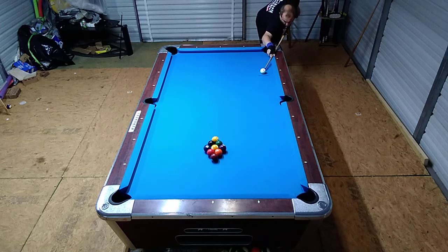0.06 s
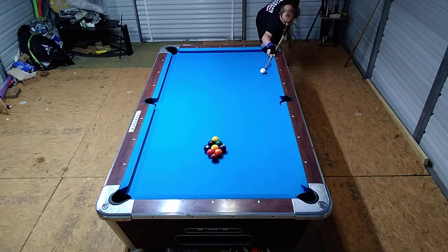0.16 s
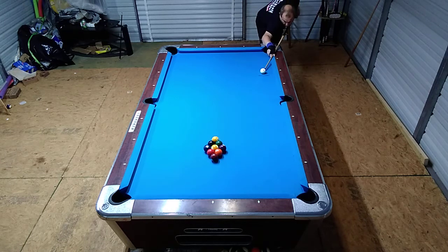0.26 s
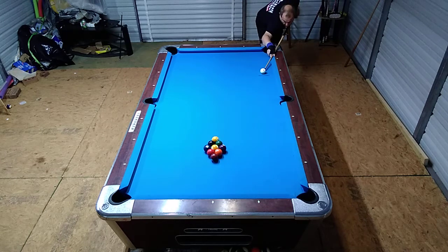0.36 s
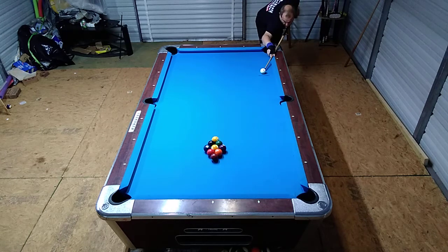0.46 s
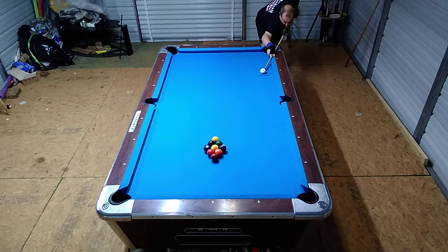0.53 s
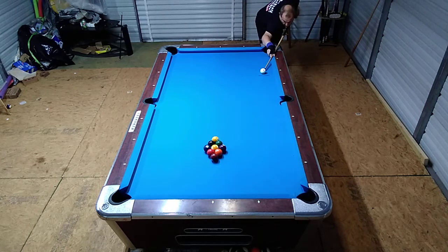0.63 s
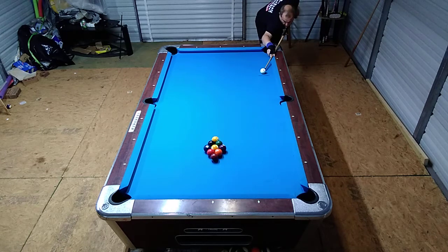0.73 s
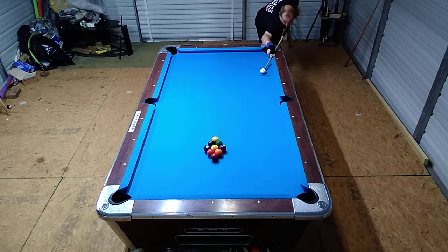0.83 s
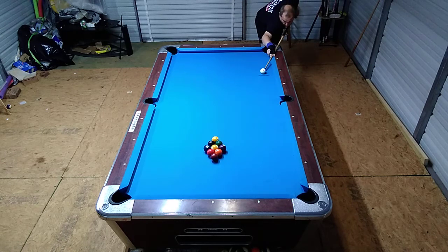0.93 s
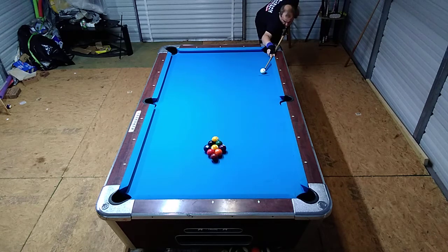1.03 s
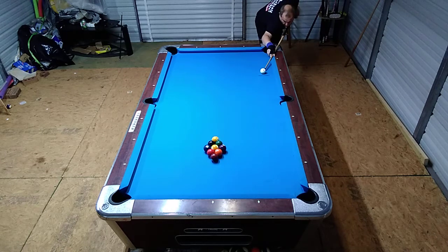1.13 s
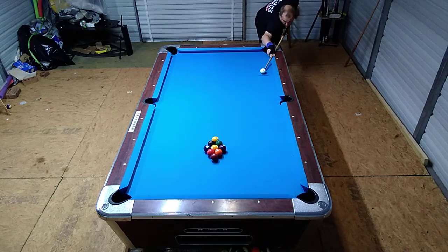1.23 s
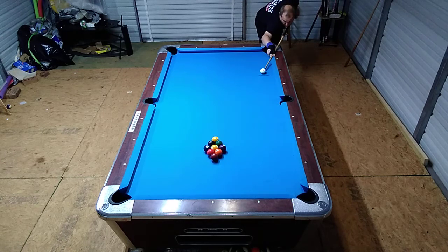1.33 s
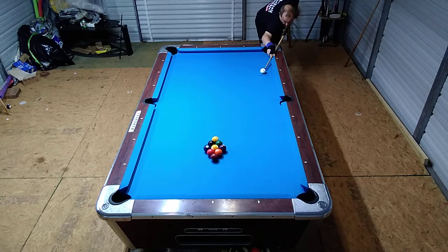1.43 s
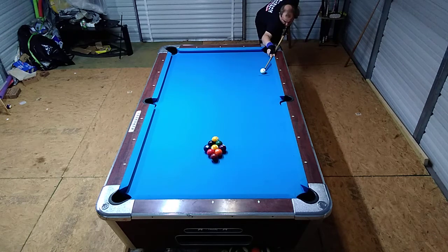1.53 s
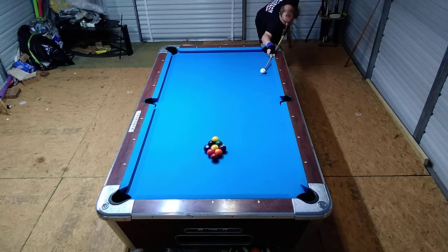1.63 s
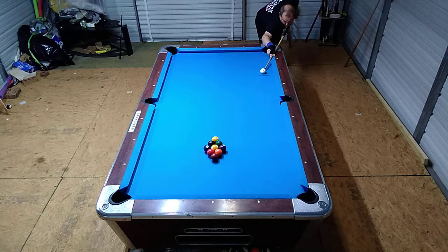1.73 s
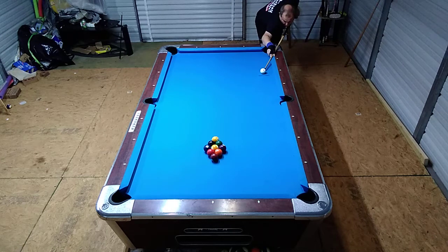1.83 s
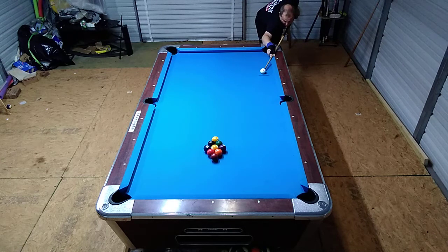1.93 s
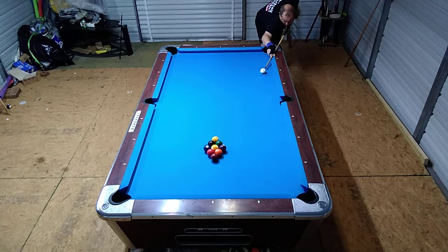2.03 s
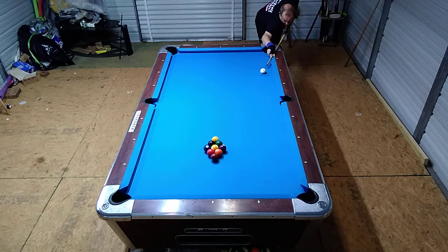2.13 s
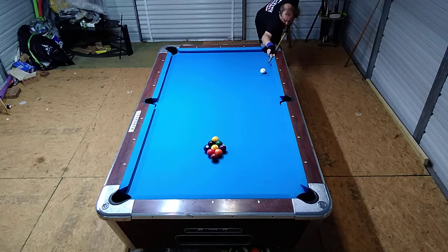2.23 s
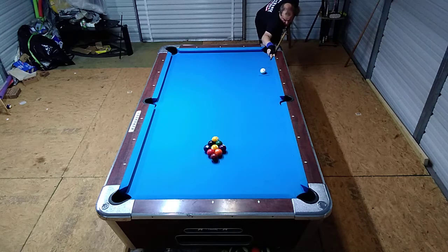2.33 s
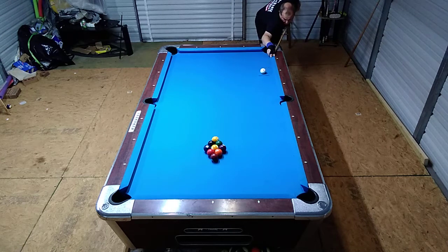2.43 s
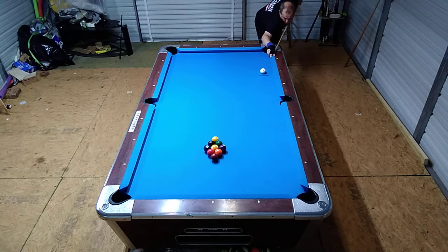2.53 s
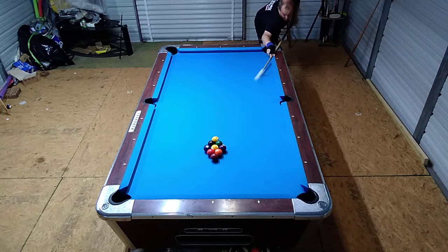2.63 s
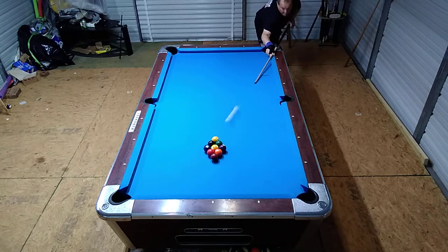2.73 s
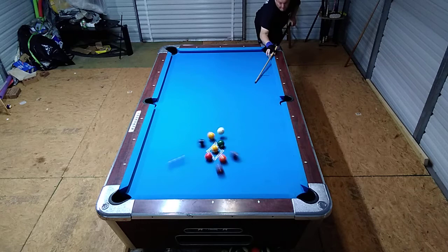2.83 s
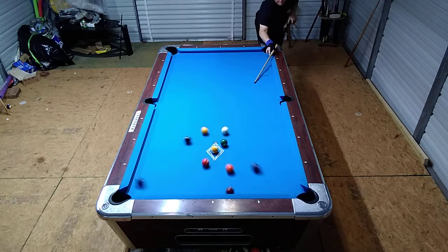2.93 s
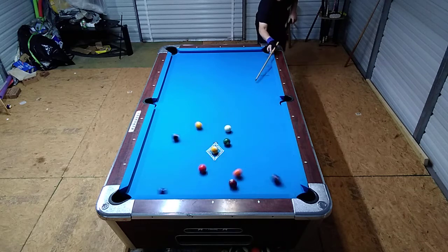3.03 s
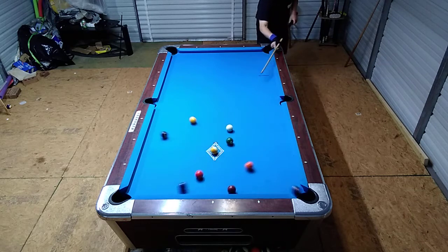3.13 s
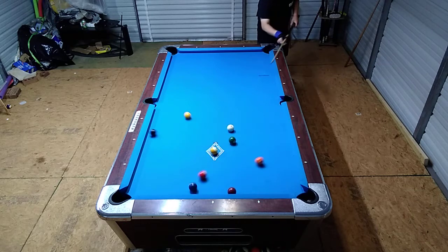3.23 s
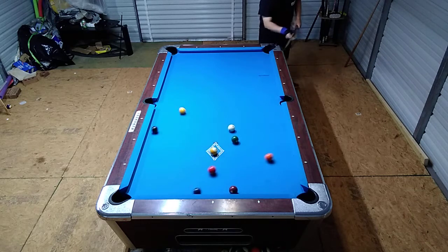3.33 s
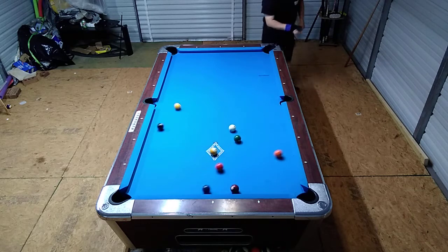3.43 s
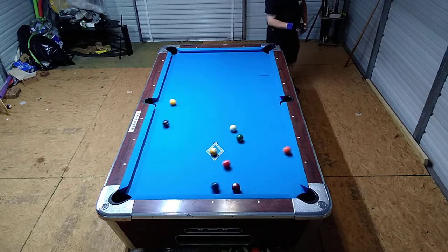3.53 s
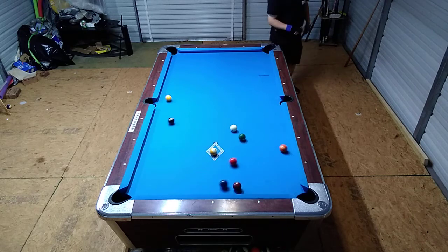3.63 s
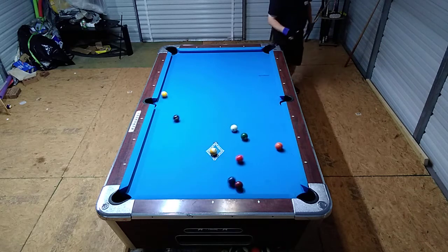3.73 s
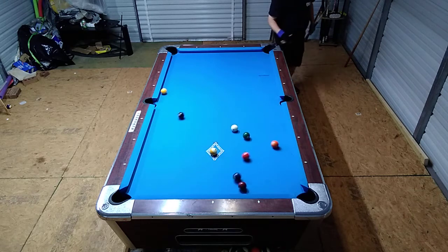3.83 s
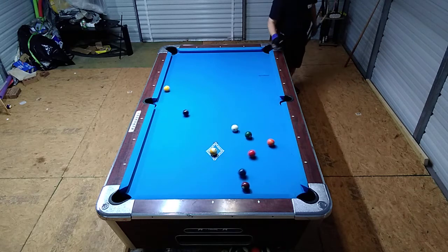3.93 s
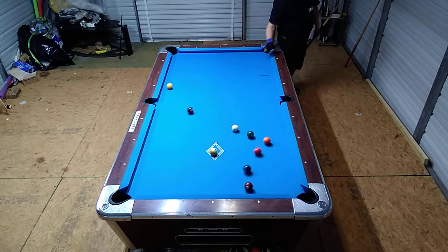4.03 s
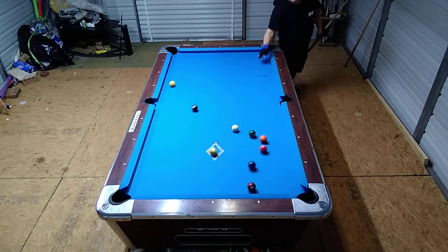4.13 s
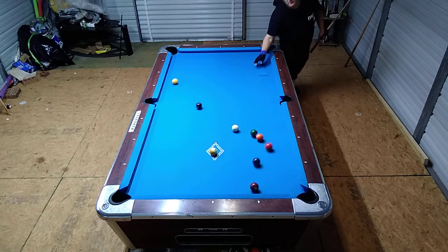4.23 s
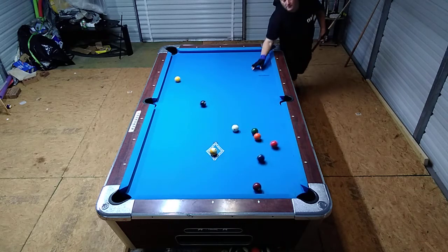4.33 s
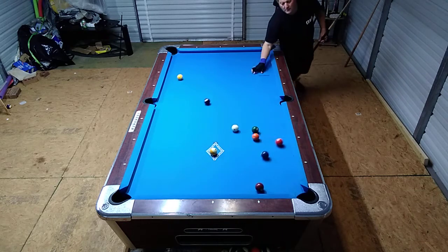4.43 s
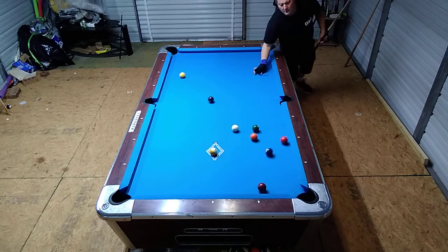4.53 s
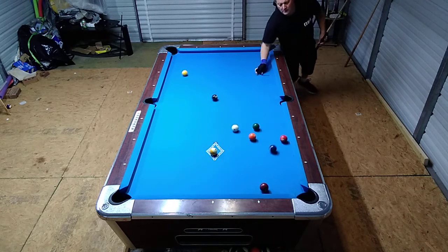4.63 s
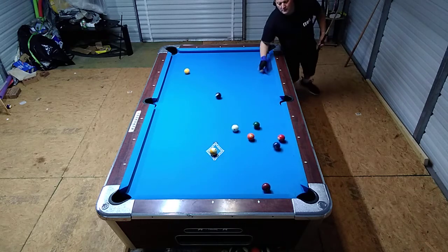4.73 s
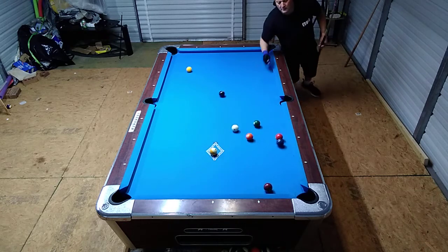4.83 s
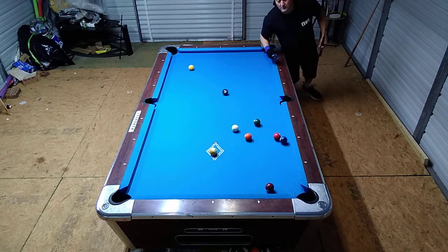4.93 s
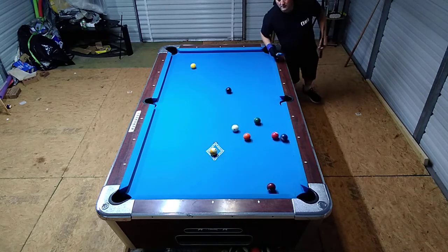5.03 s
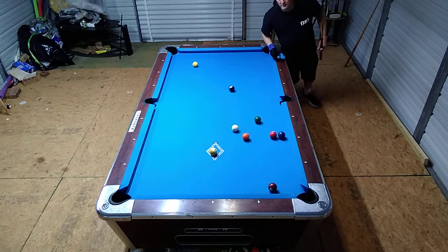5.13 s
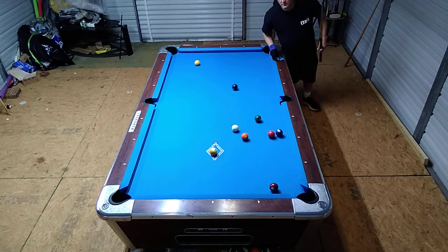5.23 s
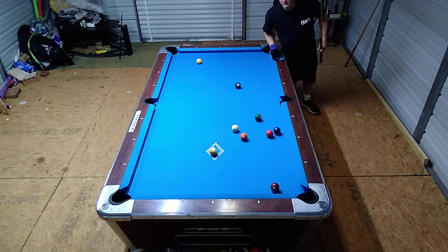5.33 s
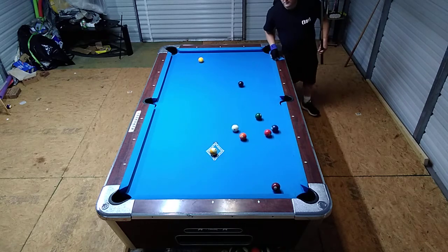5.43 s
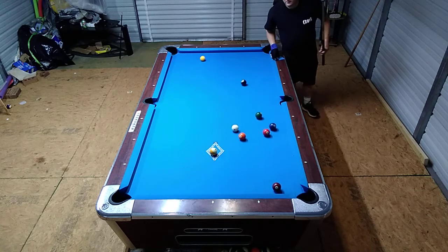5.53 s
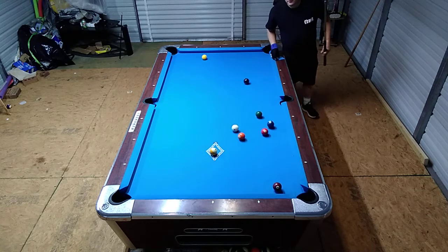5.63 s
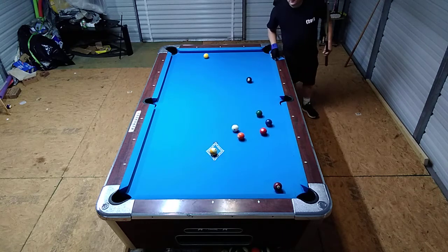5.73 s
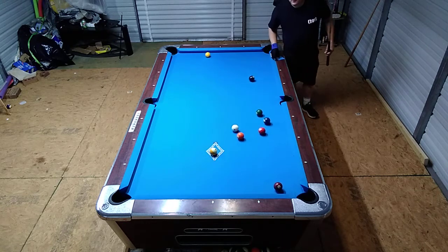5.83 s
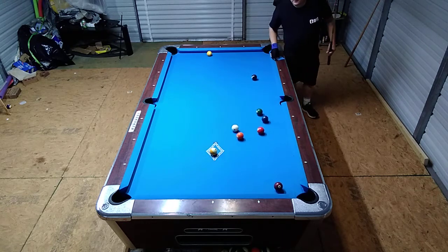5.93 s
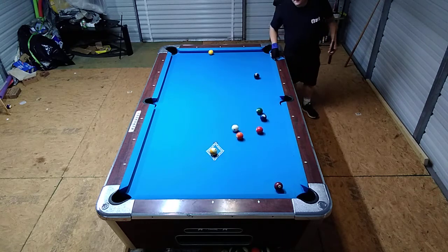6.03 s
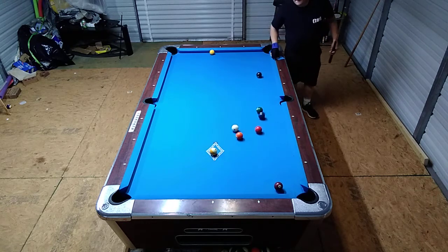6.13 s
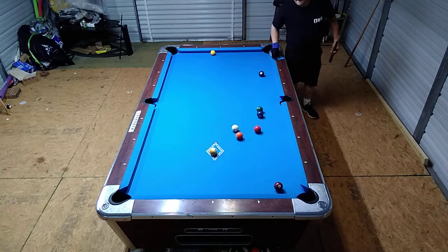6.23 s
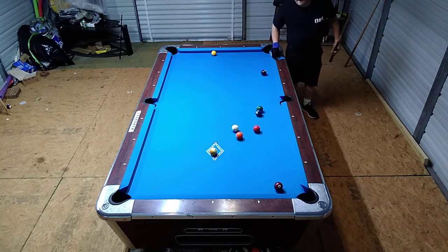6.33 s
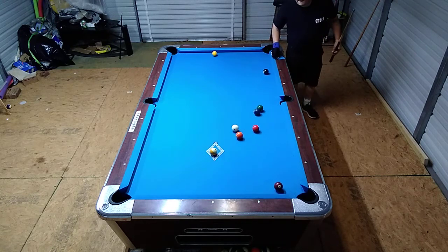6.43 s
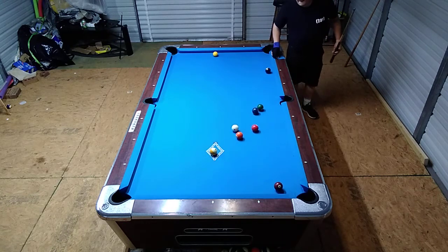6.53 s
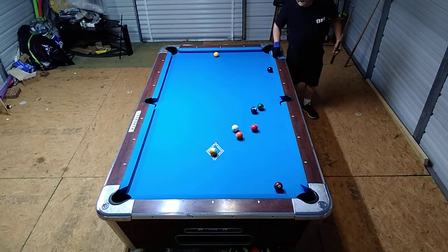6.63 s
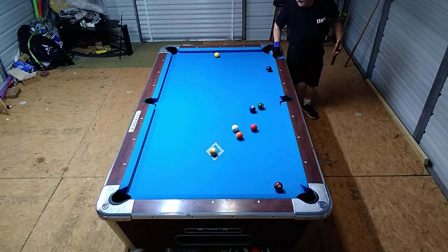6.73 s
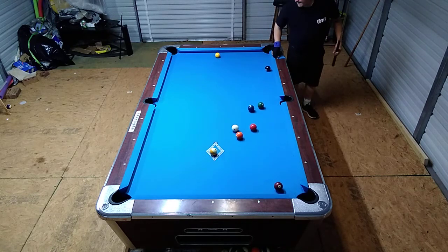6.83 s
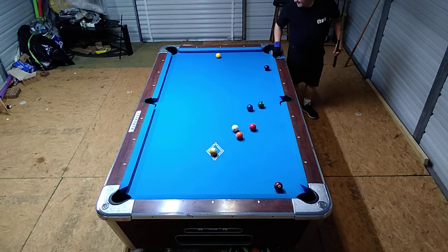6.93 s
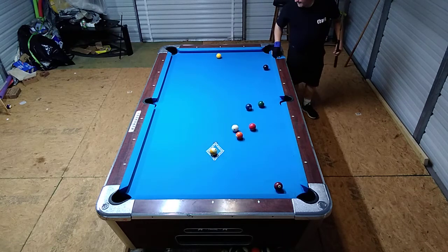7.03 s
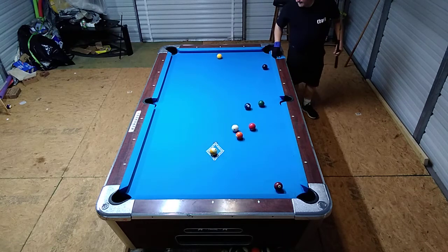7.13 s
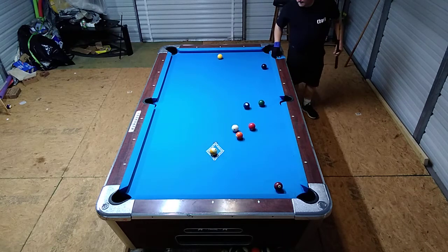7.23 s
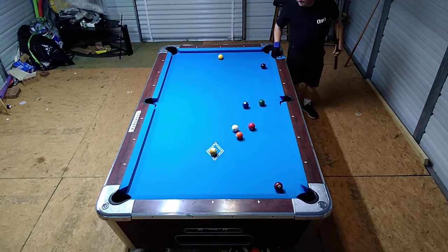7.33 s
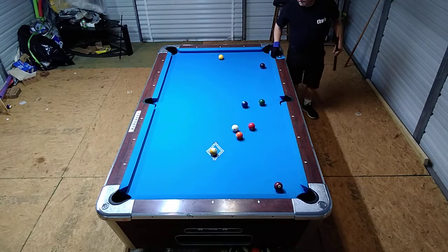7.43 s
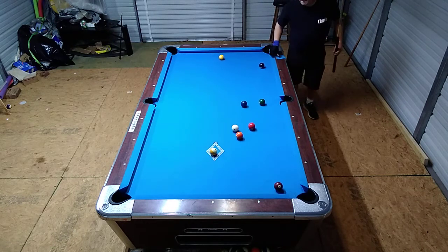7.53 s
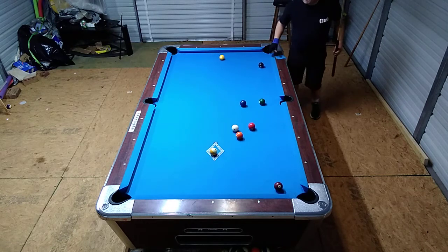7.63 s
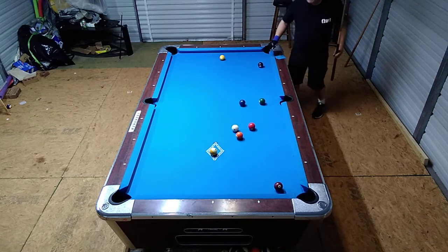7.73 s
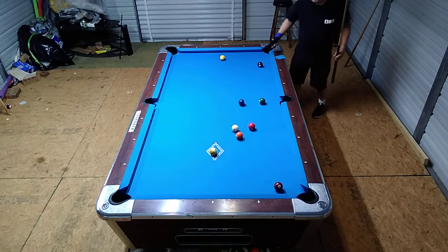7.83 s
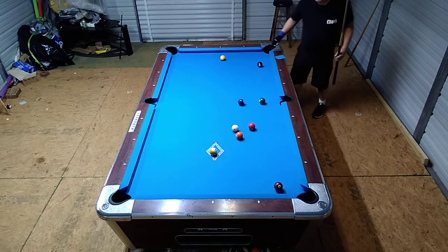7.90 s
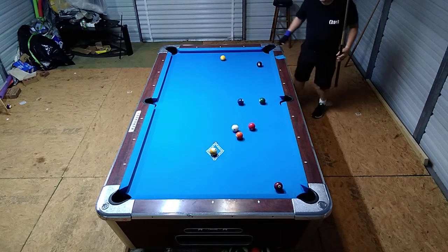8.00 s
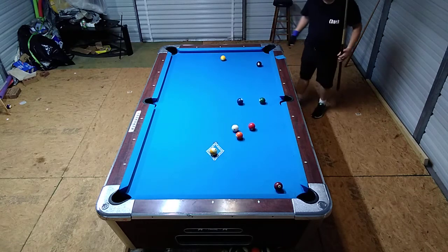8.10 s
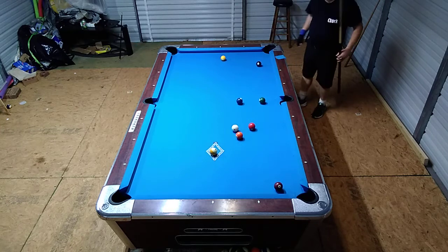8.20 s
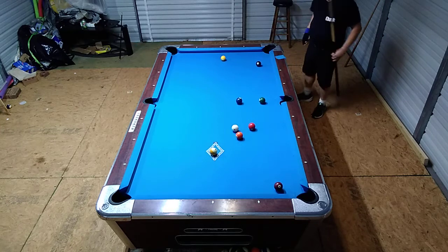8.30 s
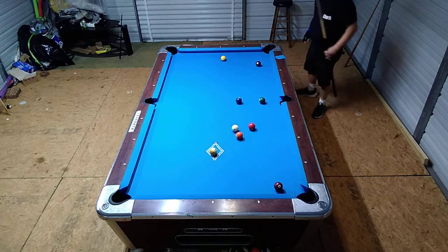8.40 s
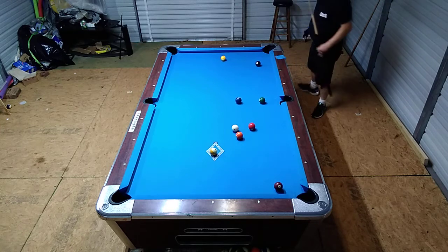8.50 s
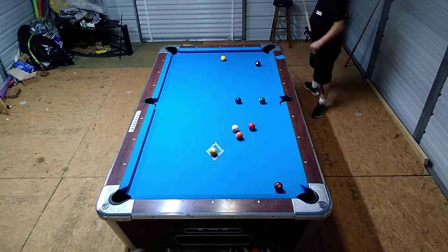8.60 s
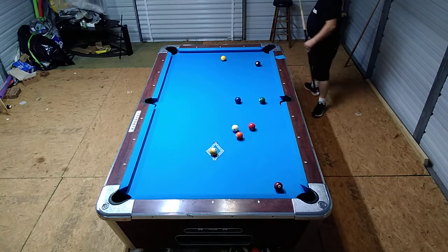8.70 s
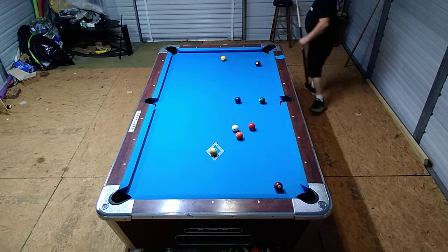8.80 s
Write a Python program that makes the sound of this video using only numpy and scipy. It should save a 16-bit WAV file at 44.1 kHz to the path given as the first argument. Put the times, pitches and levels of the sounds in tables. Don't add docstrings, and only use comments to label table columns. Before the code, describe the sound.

A quiet garage with a faint fridge hum and outdoor bird, until a pool cue strikes and the rack bursts very loudly. Hard resin clicks, hollow pocket thuds and cabinet booms tumble out within a second. Afterwards come a short squeak, board-floor steps, two long hollow ball rolls inside the table, a loud bird trill between, and a cluster of tray clacks fading away. Microphone near the table's foot, with lively metallic room echo.

```python
import sys
import numpy as np
from scipy import signal
from scipy.fft import rfft, irfft, next_fast_len
from scipy.io import wavfile
from scipy.ndimage import uniform_filter1d

SR = 44100
rng = np.random.default_rng(int(sys.argv[2]) if len(sys.argv) > 2 else 0)


def to_linear_factor(level_db):
    exponent = np.asarray(level_db, float) / 20
    return 10 ** exponent


def put_to_file(sound):
    columns = np.atleast_2d(sound).T
    safe = np.clip(columns, -1, 1)
    whole_steps = np.round(safe * 32767)
    wavfile.write(sys.argv[1], SR, whole_steps.astype(np.int16))


N = 390726
T = np.arange(N) / SR

# (multiple of motor turn [1], level [dB])
MOTOR_LINES = [(1, -74), (2, -66.5), (3, -79), (4, -85), (5, -89.5), (6, -93.5), (7, -88.5), (8, -85),
               (9, -85), (10, -88), (11, -89), (12, -95.5)]
# (frequency [Hz], density [dB/Hz])
AIR_SPECTRUM = [(25, -14.5), (55, -5), (90, -10.5), (150, -17.5), (200, -18.5), (326, -23), (560, -26),
                (750, -31), (900, -32.5), (3000, -36.5), (5000, -38), (8590, -47.5), (14800, -39),
                (16000, -45.5)]
# (frequency [Hz], side minus mid [dB])
PORT_WIDTH = [(60, -24), (110, -15.5), (200, -10), (380, -10), (700, 1), (1290, -0.5), (2380, 0),
              (4400, 1.5), (8120, -1), (15000, 2)]
# (frequency [Hz], t60 [s])
ROOM_T60 = [(60, 0.46), (250, 0.95), (1000, 0.45), (3000, 0.5), (8000, 0.53), (15000, 0.29)]
# (start [s], notes [count], peak [dB], pitch [Hz], fall [share])
BIRD_PHRASES = [
    (0.0044, 2, -75.5, 3170, .04),
    (0.62, 2, -73, 3130, .04),
    (0.7994, 1, -75, 2950, .04),
    (0.944, 3, -70, 3140, 0.036),
    (1.3, 8, -83, 3150, .1),
    (4.6499, 5.9, -60.5, 3200, 0.18),
    (5.2242, 7.1, -58.5, 3196, 0.18),
    (6.3244, 1.9, -64, 3330, 0.27),
]
# (time [s], low level [dB], swish over low [dB])
SWING = [
    (2.6, -82, -4),
    (2.65, -73.5, -19),
    (2.68, -66, -10),
    (2.72, -67.5, -7),
    (2.747, -63, -5.5),
]
# (time [s], level [dB])
SQUEAK = [
    (3.6, -79),
    (3.66, -61),
    (3.75, -53),
    (3.82, -57),
    (3.86, -59.5),
]
# (centre [Hz], width [Hz], level [dB])
SQUEAK_BANDS = [(1270, 126, -3.5), (1900, 270, -9.5), (2700, 330, -13.5)]
# (time [s], half length [s], level [dB])
BRUSHES = [
    (8.838, 0.024, -68),
]
# (frequency [Hz], level [dB], t60 [s])
SHAFT_MODES = [(1180, -4, .025), (1492, 0, .115), (2222, -11, .3), (2269, -12, .3), (2650, -2, .015)]
# (frequency [Hz], density [dB/Hz])
TIP_SPECTRUM = [(200, -12), (600, -7.5), (1200, -9.5), (1900, -29.5), (2400, -6.5), (3300, -10),
                (4500, -11), (6000, -12.5), (8500, -12.5), (11000, -10.5), (14000, -20), (16000, -20.5)]
# (frequency [Hz], level [dB], t60 [s])
FERRULE_MODES = [(2853, -12, .15), (3681, -2, .8), (3723, 0, .8), (3838, -8, .3)]
# (time [s], peak [dB], rap [dB], thump [dB], bright edge [dB])
RAIL_KNOCKS = [
    (2.848, -12, -32, -12.5, -26),
    (3.029, -10.5, -1, -20, -18.5),
    (3.045, -10, -35, -7, -44),
    (3.3274, -12, -5.5, -1, -15.5),
    (3.391, -16.5, 0, -1, -10),
    (3.436, -23, -27, 1.5, -18),
    (3.924, -67, -10, 25, -34),
]
# (time [s], peak [dB], rap [dB], thump [dB], bright edge [dB])
BEND_KNOCKS = [(4.022, -34, -2, -7, -42), (4.047, -49, -17, 19, -38), (4.123, -29.5, -2.5, 5.5, -22.5),
               (4.142, -42, -16, 9, -30), (4.268, -35.5, -7, 12, -21), (4.939, -57, -2, 21, -30),
               (5.6025, -19.5, -16, 5.5, -40), (5.634, -16.5, -12.5, -6, -36), (5.64, -28, -9, 7.5, -25),
               (5.66, -24, -16, 5.5, -39), (5.694, -27, -8.5, 2, -19.5), (6.0234, -20, -15, -5.5, -36),
               (6.04, -27, -30, 1, -43), (6.104, -31, -15, 6, -40), (6.376, -46, -21, 0, -27),
               (6.727, -52.5, -11, 4, -30)]
# (time [s], peak [dB], rap [dB], thump [dB], bright edge [dB])
TRAY_KNOCKS = [(7.09, -39, 0.5, 7, -29), (7.111, -35, -10, 11, -47), (7.132, -33, -20, 7, -48.5),
               (7.196, -26.5, 0, 3.5, -27), (7.24, -32.5, -13, 10.5, -48), (7.343, -29.5, -8, -6, -48),
               (7.385, -34.5, -22, 5.5, -48), (7.49, -48, -8, 16, -29), (7.817, -68.5, -4, 11, -9.5),
               (7.881, -43, -14, 4.5, -45), (7.96, -52, -8, 8.5, -28), (8.133, -53, -29, 13, -40),
               (8.163, -63, -28.5, 29.5, -29), (8.725, -61.5, -22.5, 10.5, -5.5), (8.813, -57, 11, 13, 4.5)]
# (frequency [Hz], level [dB], t60 [s])
CABINET_MODES = [(57, -4.5, 0.28), (101, -2, 0.31), (110.5, -8.5, 0.25), (152, 2, 0.22), (182.3, 4, 0.22),
                 (264, 9, .2), (291.9, 2.5, 0.44), (344, 3, 0.15), (399.2, -2.5, 0.23), (447, -1, 0.11),
                 (495, -6.5, 0.24), (547.7, -9, 0.19), (604, -7, 0.097), (680, -8, 0.047),
                 (750, -12, 0.026), (800, -17.5, 0.073), (1144, -14, 0.089), (1275, -13.5, 0.045),
                 (1875, -15, 0.045)]
# (frequency [Hz], level [dB], t60 [s])
PANEL_MODES = [(88.27, -3, .2), (124, -5, .15), (207, 1.5, 0.18), (280, 7.5, .25), (326.3, 5.5, .25),
               (377.1, 0, 0.18), (636, -8, .15)]
# (time [s], peak [dB], ring [Hz])
RACK_CLICKS = [(2.8963, 5, 2600), (2.8988, 1, 2600), (2.9012, -9, 2300), (2.9122, -11, 2200),
               (2.9205, -11, 2950), (2.9242, -10, 2800), (2.9265, -11, 2600), (2.9301, -8, 2700),
               (2.9302, -14, 1300), (2.933, -9, 2800), (2.9357, -4, 2650), (2.9487, -8, 2500),
               (2.9531, -13, 2600), (2.9588, -13, 1900), (2.9657, -7.5, 2500), (2.9735, -12, 2400),
               (2.9855, -15, 2400), (2.9897, -16, 2500), (3.015, -17, 2400)]
# (time [s], peak [dB], ring [Hz], bright edge [dB], left minus right [dB])
BALL_CLICKS = [
    (3.125, -6.5, 2260, -20, 14),
    (3.1489, -23, 2300, -14, 21),
    (3.303, -11, 2202, -14.5, 2),
    (3.835, -41.5, 2153, -22, -5),
    (3.841, -31.5, 1930, -20.5, -14),
    (4.3921, -29.5, 1930, -23, 14),
]
# (time [s], peak [dB], ring [Hz])
KISSES = [
    (6.4665, -42.5, 1610),
    (6.5281, -61, 1790),
]
# (time [s], peak [dB], ring [Hz], bright edge [dB], left minus right [dB])
CLICK_TWINS = [
    (4.3899, -30, 2020, -24, -5),
]
# (lag [s], level [dB])
SLATE_REPEATS = [
    (0, -0.5),
    (.0007, -3.5),
    (.0016, -10),
    (.0029, -9.5),
    (.0045, -20.5),
]
# (time [s], peak [dB])
TRAY_CLACKS = [(7.0862, -38), (7.111, -32.5), (7.1928, -22), (7.2039, -24.5), (7.2395, -23),
               (7.2627, -30.5), (7.3441, -24.5), (7.3668, -34), (7.386, -33.5), (7.421, -40),
               (7.489, -43.5), (7.5532, -54.5)]
# (frequency [Hz], level [dB], t60 [s])
CLACK_MODES = [(1238, 1, 0.067), (1487, -1, 0.038), (1876, 3.5, 0.036), (2290, 0.5, 0.022),
               (2670, -2, 0.017), (3130, -8, 0.019), (3770, -15, 0.024)]
# (time [s], level [dB], boom over level [dB], hold [s], t60 [s])
POCKET_FALLS = [
    (3.03, -22, 0, 0.062, 0.53),
    (3.327, -22, -9.5, 0.034, 0.63),
    (3.41, -28.5, -1.5, 0.1, 0.35),
]
# (time [s], level [dB], boom over level [dB], hold [s], t60 [s])
RUN_FALLS = [
    (4.023, -33, -9, 0.053, 0.64),
    (4.124, -32, -1.5, 0.085, 0.39),
    (5.603, -22.5, -5.5, 0.07, 0.89),
    (6.024, -31, -4, 0.11, 0.71),
    (7.131, -21, -8, 0.083, 0.59),
    (7.26, -39, -3.5, 0.19, 0.59),
]
# (time [s], level [dB], boom over level [dB], hold [s], t60 [s])
ROLL_BACKS = [
    (7.881, -45.5, 1, 0.069, 0.42),
    (8.13, -55.5, 13, 0.053, 0.59),
]
# (time [s], level [dB])
CLOTH_ROLL = [
    (2.752, -25),
    (2.87, -32.5),
    (3.02, -25),
    (3.05, -28.5),
    (3.6, -44),
    (3.77, -52.5),
    (3.87, -62.5),
    (4.01, -59),
    (4.03, -71),
]
# (time [s], level [dB])
RUN_ROLLS = [
    [(4.13, -50), (4.4, -32), (4.55, -43), (4.78, -44), (4.86, -47), (5.08, -37.5), (5.3, -42.5),
     (5.46, -37.5), (5.6, -40), (5.63, -59.5)],
    [(6.05, -55), (6.3, -44.5), (6.5, -36), (6.74, -37.5), (7.0, -38.5), (7.12, -32), (7.16, -60)],
    [(8.2, -69), (8.44, -67.5), (8.56, -62.5), (8.76, -58.5), (8.86, -64.5)],
]
# (time [s], peak [dB])
FOOTFALLS = [(3.66, -37), (3.781, -50), (3.92, -43.5), (5.04, -46.5), (5.33, -44.5), (5.529, -39.5),
             (6.81, -38), (6.99, -50), (7.805, -49.5), (8.48, -64.5), (8.71, -47)]
# (frequency [Hz], level [dB])
CLATTER_SPECTRUM = [(400, -14.5), (750, 2.5), (1400, -8.5), (1900, -16), (3000, -25), (5000, -39), (15000, -50)]
# (frequency [Hz], level [dB], t60 [s])
LINER_MODES = [(1300, -1, 0.13), (1310, -8.5, 0.0974)]
# (boom [dB], drum [dB], rumble [dB], clatter [dB])
POCKET_MIX_DB, RUN_MIX_DB = (0.4, -0.3, 0.74, -26), (1.2, 0.1, 1, -10.5)
CLOTH_MIX_DB, TRACK_MIX_DB = (-8, 0, -3, -35), (-7, 1.5, -0.5, -18.5)
SETTLE_MIX_DB, STEP_MIX_DB = (-2.6, 1.1, 1, -3.5), (0.9, -30, -18.5, -41)

CUE_S, FERRULE_LAG_S = 2.7483, 0.0062
TIP_DB = -12.5


def on_log(table, hz):
    points_hz, values = np.array(table).T
    return np.interp(np.log(np.maximum(hz, 1)), np.log(points_hz), values)


def colour(x, table):
    length = x.shape[-1]
    size = next_fast_len(length)
    gain = to_linear_factor(on_log(table, np.fft.rfftfreq(size, 1 / SR)))
    return irfft(rfft(x, size) * gain, size)[..., :length]


def band(x, lo_hz, hi_hz):
    edges_hz = [lo_hz, min(hi_hz, 0.45 * SR)]
    return signal.sosfilt(signal.butter(2, edges_hz, "band", fs=SR, output="sos"), x)


def unit(x):
    return x / np.sqrt(np.mean(x ** 2))


def curve(rows, column):
    rows = np.array(rows)
    return to_linear_factor(np.interp(T, rows[:, 0], rows[:, column], left=-200, right=-200))


def walk(rate_hz):
    k = int(SR / rate_hz)
    steps = np.repeat(rng.standard_normal(N // k + 1), k)
    return 2.2 * uniform_filter1d(uniform_filter1d(steps, k), k)[:N]


def wide(size):
    mid, side = rng.standard_normal((2, size))
    side = colour(side, PORT_WIDTH)
    return np.array([mid + side, mid - side])


def ring(modes, seconds, damp=0.73, scatter_db=0.):
    t = T[:int(seconds * SR)]
    y = np.zeros(len(t))
    for hz, db, t60_s in modes:
        level = to_linear_factor(db + scatter_db * rng.normal()) * rng.choice([-1, 1])
        y += level * np.sin(2 * np.pi * hz * t) * to_linear_factor(-60 * t / (t60_s * damp))
    return y / np.abs(y).max()


def add(track, s, sound):
    i = int(s * SR)
    track[..., i:i + sound.shape[-1]] += sound[..., :track.shape[-1] - i]


def floor():
    hum = np.zeros(N)
    for turn, db in MOTOR_LINES:
        phase = 2 * np.pi * (turn * 61.47 * T + rng.random())
        hum += to_linear_factor(db - 0.5 + (0.5 + 0.13 * turn) * walk(2.5)) * np.sin(phase)
    air = colour(wide(N), AIR_SPECTRUM)
    air = air * to_linear_factor(-80) / np.std(band(air, 1100, 16000))
    sag_db_per_s = 1.96
    hiss_db = np.where(T < CUE_S, -92.5, -69.5 - sag_db_per_s * (T - CUE_S))
    return hum + air * to_linear_factor(0.43 * walk(3.2)) + to_linear_factor(hiss_db) * unit(band(wide(N), 1900, 19000))


def bird():
    out, t = np.zeros(N), T[:700]
    note_gap_s, swell_db = 0.0315, 11
    for s, notes, db, hz, fall in BIRD_PHRASES:
        for k in range(min(round(notes), 8)):
            late, off = rng.standard_normal(2)
            glide = 1 + fall / 2 * (1 - t / t[-1])
            note = np.hanning(len(t)) * np.sin(2 * np.pi * hz * (1 + 0.012 * off) * t * glide)
            soft_db = swell_db * (np.exp(-k / 2) if notes > 4 else k / 2)
            add(out, max(s - 0.004 + k * note_gap_s + 0.00058 * late, 0), to_linear_factor(db - soft_db) * note)
    return out


def cricket():
    first_s, gap_s, tone_hz, level_db = 0.165, 0.368, 5200, -89
    phase = ((T - first_s) / gap_s + 0.5) % 1 - 0.5
    pulses = np.exp(-phase ** 2 / 0.0027)
    return to_linear_factor(level_db + 1.5 * walk(3.2)) * pulses * np.sin(2 * np.pi * tone_hz * T)


def player():
    low, swish = unit(band(wide(N), 200, 500)), unit(band(wide(N), 900, 6000))
    swing = curve(SWING, 1) * (low + curve(SWING, 2) * swish)
    squeak = sum(to_linear_factor(db) * unit(band(wide(N), hz - w / 2, hz + w / 2)) for hz, w, db in SQUEAK_BANDS)
    squeak = curve(SQUEAK, 1) * to_linear_factor(1.8 * walk(44)) * squeak
    brush = sum(to_linear_factor(db) * np.exp(-((T - s) / half_s) ** 2) for s, half_s, db in BRUSHES)
    return swing + squeak + brush * unit(band(wide(N), 800, 7100))


def cue_strike(near, send):
    t = T[:2000]
    cue = to_linear_factor(-8.5) * ring(SHAFT_MODES, 0.5)
    swell_s, first_share = 0.005, 0.45
    cue *= 1 - (1 - first_share) * np.exp(-(T[:len(cue)] / swell_s) ** 2)
    snap = to_linear_factor(TIP_DB) * unit(colour(rng.standard_normal(len(t)), TIP_SPECTRUM)) * np.exp(-t / 0.0011)
    crack = to_linear_factor(-20) * snap
    add(crack, FERRULE_LAG_S, snap)
    add(cue, FERRULE_LAG_S, to_linear_factor(-20.5) * ring(FERRULE_MODES, 0.47))
    add(near, CUE_S, cue)
    add(near, CUE_S, crack)
    click_delay = 100
    even = unit(colour(np.eye(1, len(t), click_delay)[0], TIP_SPECTRUM))
    add(send, CUE_S + FERRULE_LAG_S - click_delay / SR, to_linear_factor(5 + TIP_DB - 18.5) * even)
    add(send, CUE_S, to_linear_factor(-17) * cue)


def shake(gain, s, mix_db, rise_s, hold_s, t60_s):
    t = T[:int(1.5 * SR)]
    fall_db = np.reshape(mix_db, (-1, 1)) - 60 * np.maximum(t - hold_s, 0) / t60_s
    add(gain, s, to_linear_factor(fall_db) * (1 - np.exp(-t / rise_s)))


def cabinet_layers():
    t = T[:SR // 2]
    jumps_db = rng.exponential(size=N // 50 + 1).repeat(50)[:N]
    rough = to_linear_factor(1.8 * jumps_db + 1.1 * walk(30))
    response = np.zeros(len(t))
    for k, (hz, db, t60_s) in enumerate(sorted(CABINET_MODES + PANEL_MODES)):
        response += (-1) ** k * to_linear_factor(db) * np.sin(2 * np.pi * hz * t) * to_linear_factor(-60 * t / (0.58 * t60_s))
    body = signal.fftconvolve(wide(N) * rough, response[None], axes=1)[:, :N]
    boom = unit(band(band(body, 52, 125), 54, 200))
    drum, rumble = unit(band(body, 125, 290)), unit(band(body, 290, 620))
    clatter = unit(colour(wide(N) * rough, CLATTER_SPECTRUM))
    late = int(ROLL_BACKS[0][0] * SR)
    soft = signal.butter(6, 1410, fs=SR, output="sos")
    clatter[:, late:] = signal.sosfilt(soft, clatter[:, late:])
    return boom, drum, rumble, clatter


def rolling():
    layers = cabinet_layers()
    gain = np.outer(to_linear_factor(CLOTH_MIX_DB), curve(CLOTH_ROLL, 1))
    gain += np.outer(to_linear_factor(TRACK_MIX_DB), sum(curve(run, 1) for run in RUN_ROLLS))
    rise_s = np.array([[0.0075], [0.0023], [0.0023], [0.0023]])
    share = np.array([[1], [1], [1], [0.55]])
    boom_only = np.array([1, 0, 0, 0])
    for falls, mix_db in ((POCKET_FALLS, POCKET_MIX_DB), (RUN_FALLS, RUN_MIX_DB), (ROLL_BACKS, SETTLE_MIX_DB)):
        for s, db, boom_db, hold_s, t60_s in falls:
            level_db = db + np.array(mix_db) + boom_db * boom_only
            shake(gain, s, level_db, rise_s, hold_s * share, t60_s * share)
    for s, db in FOOTFALLS:
        shake(gain, s, db + np.array(STEP_MIX_DB), rise_s=0.022, hold_s=0.026, t60_s=0.47)
    return sum(g * layer for g, layer in zip(gain, layers))


def knocks(near, send):
    t = T[:2000]
    for s, db, rap_db, thump_db, edge_db in RAIL_KNOCKS + BEND_KNOCKS + TRAY_KNOCKS:
        chatter = 0.07 * rng.standard_normal(len(t)) * np.exp(-t / 0.0074)
        contact = np.exp(-t / 0.00004) + chatter
        wood = band(band(band(contact, 330, 1400), 250, 2100), 150, 1600)
        rap = band(band(contact, 1100, 3600), 1290, 4600)
        knock = to_linear_factor(thump_db - 4) * ring(CABINET_MODES, 0.4, damp=0.13, scatter_db=4)
        knock[:len(t)] += wood / np.abs(wood).max()
        knock[:len(t)] += to_linear_factor(rap_db) * rap / np.abs(rap).max()
        knock[:len(t)] += to_linear_factor(edge_db + 11.5) * band(contact, 4400, 16000)
        add(near, s, to_linear_factor(db - 6.5) * knock)
        add(send, s, to_linear_factor(db - 1) * knock)


def ball_click(hz, edge_db, spread):
    t, out = T[:300], np.zeros(600)
    pulse = np.sin(2 * np.pi * hz * t) * np.exp(-(t * hz - 1.25) ** 2 / spread)
    jolt = np.exp(-t / 0.00003)
    edge = to_linear_factor(edge_db + 12) * band(jolt, 10000, 16000)
    bite = to_linear_factor(-9) * band(band(jolt, 4400, 6100), 4400, 6100)
    pulse = pulse + edge + bite
    for lag_s, db in SLATE_REPEATS:
        add(out, lag_s * rng.uniform(0.44, 1.6), to_linear_factor(db) * rng.choice([-1, 1]) * pulse)
    return pulse, out


def ball_clicks(near, send):
    packed_cycles2, lone_cycles2 = 0.8, 0.44
    rack = [(*row, -27.5, -1.5) for row in RACK_CLICKS]
    kisses = [(*row, -29.5, 1.5) for row in KISSES]
    clicks = rack + BALL_CLICKS + kisses
    for k, (s, db, hz, edge_db, pan_db) in enumerate(clicks + CLICK_TWINS):
        spread = packed_cycles2 if 0 < k < len(rack) else lone_cycles2
        pulse, click = ball_click(hz, edge_db, spread)
        pan = np.array([[pan_db], [-pan_db]]) / 2
        add(near, s - 0.0004, to_linear_factor(db - 1.5 + pan) * click)
        if k < len(clicks):
            add(send, s, to_linear_factor(db - 5.5 - 0.12 * db) * pulse)


def pocket_liner(near, send):
    liner_s = 3.04
    liner = to_linear_factor(-19.5) * ring(LINER_MODES, 0.35)
    add(near, liner_s, liner)
    add(send, liner_s, to_linear_factor(-9.5) * liner)


def tray_clacks(near, send):
    for s, db in TRAY_CLACKS:
        modes = [(hz * (1 + 0.035 * rng.normal()), *rest) for hz, *rest in CLACK_MODES]
        clack = to_linear_factor(db) * ring(modes, 0.15, scatter_db=0.5)
        clack *= 1 - np.exp(-T[:len(clack)] / 0.00033)
        add(near, s, to_linear_factor(1) * clack)
        add(send, s, to_linear_factor(-4) * clack)


def room(send):
    t = T[:SR]
    rise_s, gap_s = 0.0024, 0.00054
    sparse = to_linear_factor(3.5 * rng.exponential(size=SR) * np.exp(-t / 0.004))
    noise = rfft(wide(SR) * sparse)
    octave = np.log2(np.maximum(np.fft.rfftfreq(SR, 1 / SR), 1) / 40)
    tail = np.zeros((2, SR))
    for k in range(10):
        part = irfft(noise * np.clip(1 - np.abs(octave - k), 0, 1), SR)
        tail += part * to_linear_factor(-60 * t / on_log(ROOM_T60, 40 * 2 ** k))
    tail *= np.clip(1 - np.exp((gap_s - t) / rise_s), 0, 1)
    tail *= 4 / np.sqrt(np.sum(tail ** 2))
    return signal.fftconvolve(send[None], tail, axes=1)[:, :N]


def scene():
    near, send = np.zeros((2, N)), np.zeros(N)
    far = bird() + cricket()
    for source in (cue_strike, knocks, ball_clicks, pocket_liner, tray_clacks):
        source(near, send)
    return near + far + room(send + to_linear_factor(-8.5) * far) + rolling() + player() + floor()


def roll_off(x):
    return signal.sosfilt(signal.butter(12, 16990, fs=SR, output="sos"), x)


def record(dry):
    mid, side = (dry[0] + dry[1]) / 2, band((dry[0] - dry[1]) / 2, 130, 19000)
    ports = to_linear_factor([[-0.3], [0.3]]) * np.array([mid + side, mid - side])
    ports = signal.sosfilt(signal.butter(4, 46, "high", fs=SR, output="sos"), ports)
    ports = np.tanh(0.96 * ports) / 0.84
    ports = signal.sosfilt(signal.ellip(8, 0.2, 60, 15900, fs=SR, output="sos"), ports)
    return roll_off(ports)


dry = scene()
out = record(dry)
put_to_file(out)
```